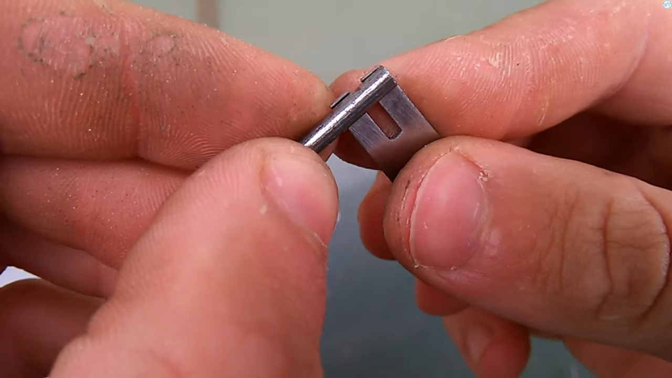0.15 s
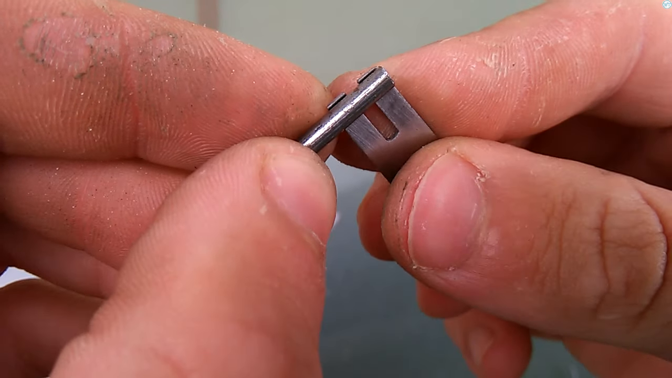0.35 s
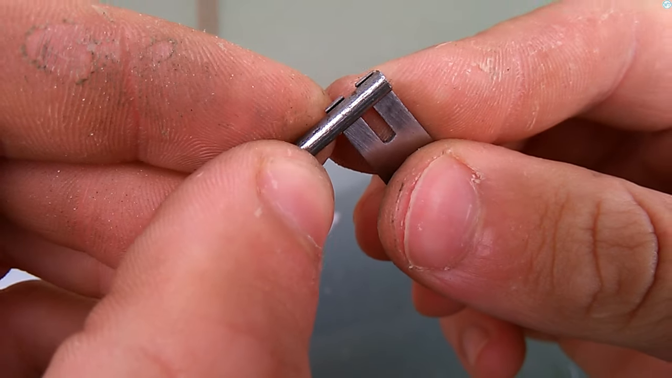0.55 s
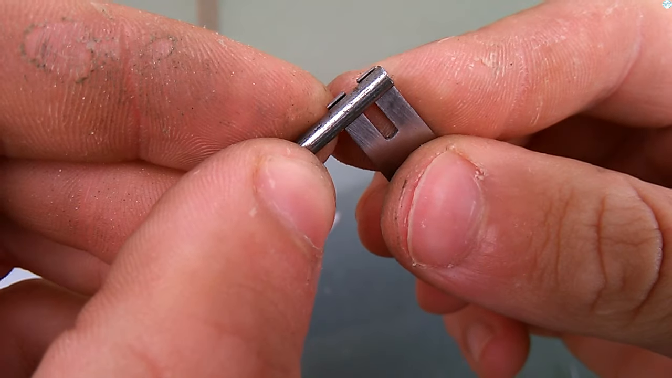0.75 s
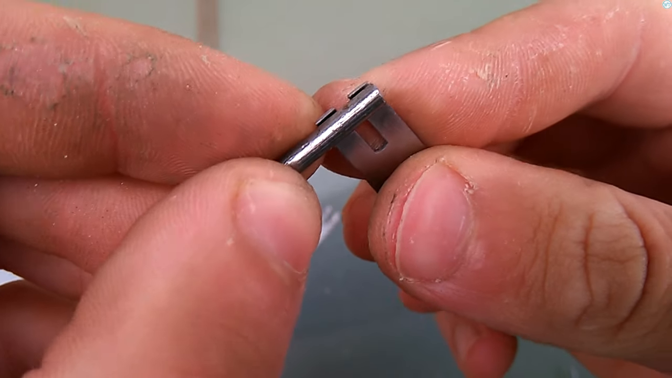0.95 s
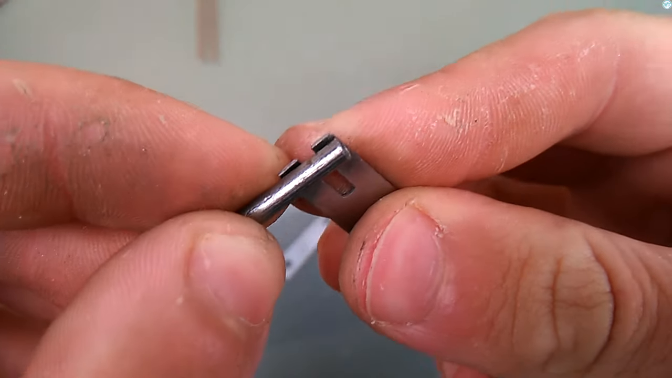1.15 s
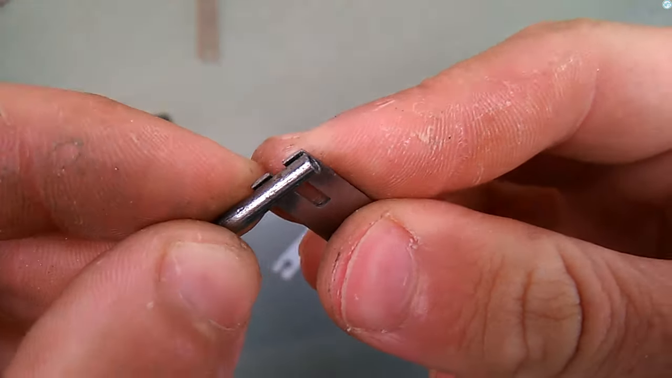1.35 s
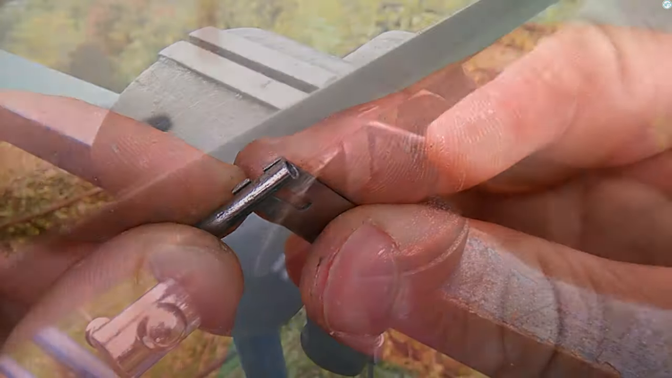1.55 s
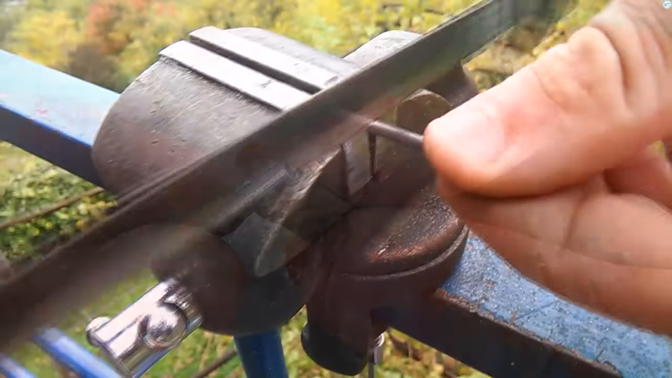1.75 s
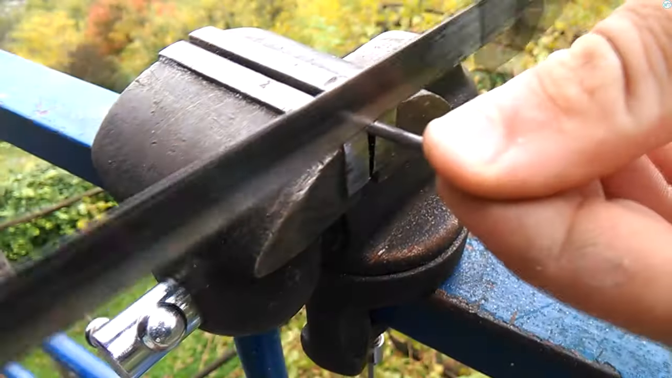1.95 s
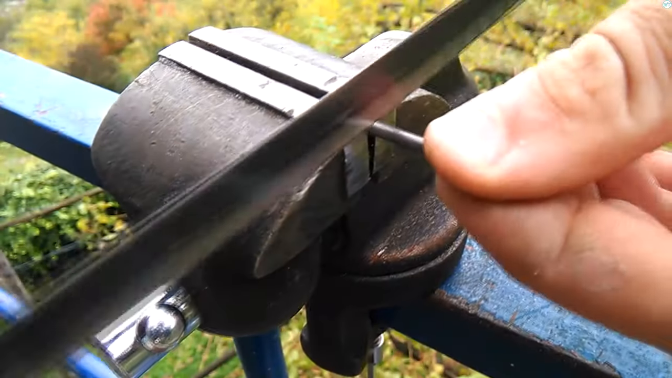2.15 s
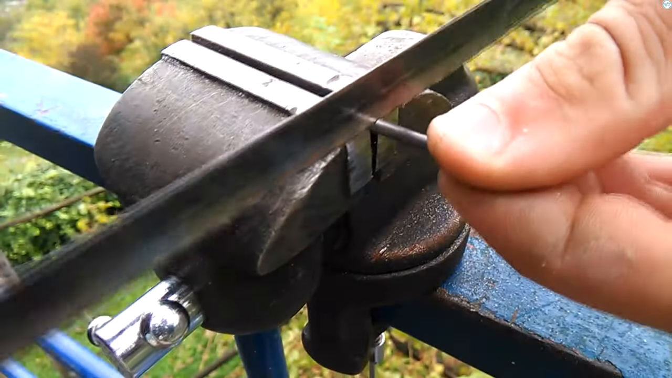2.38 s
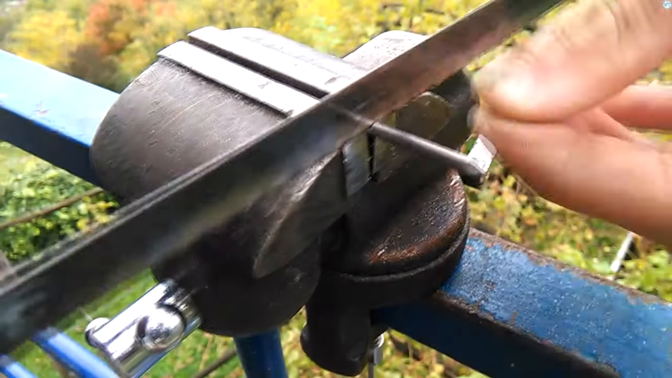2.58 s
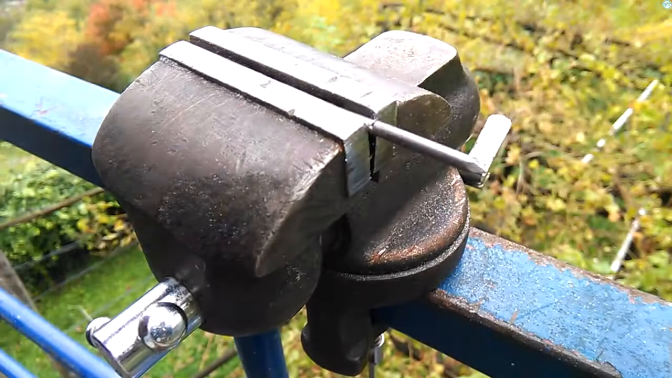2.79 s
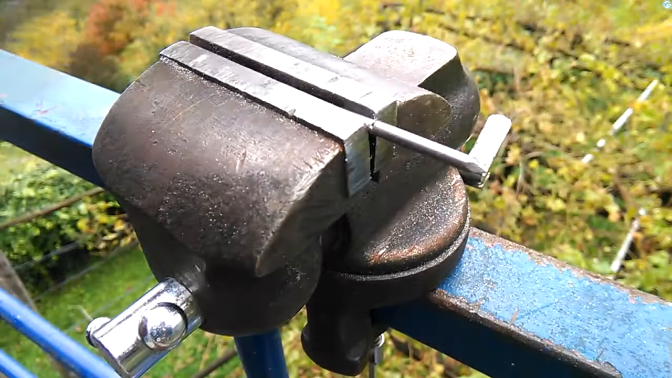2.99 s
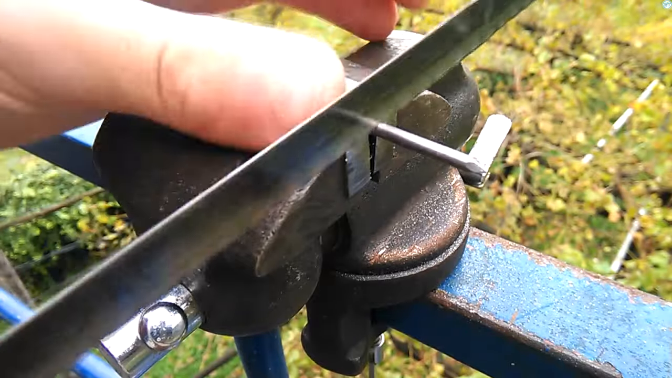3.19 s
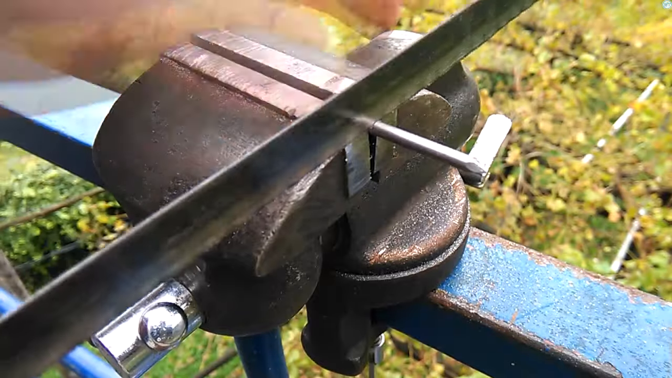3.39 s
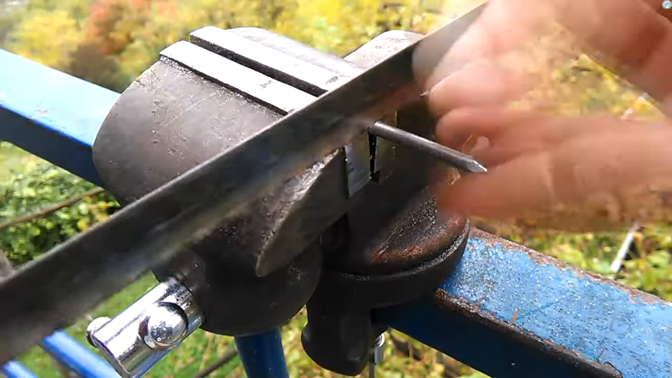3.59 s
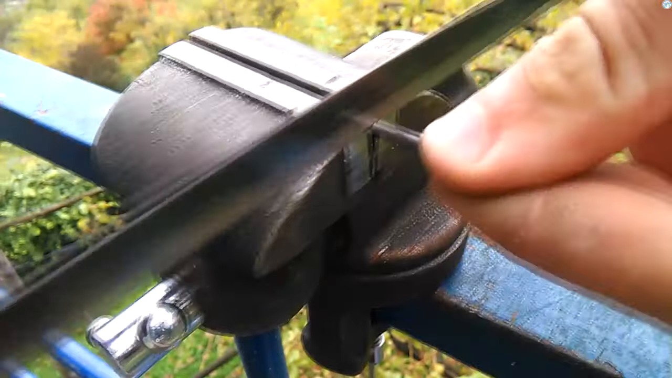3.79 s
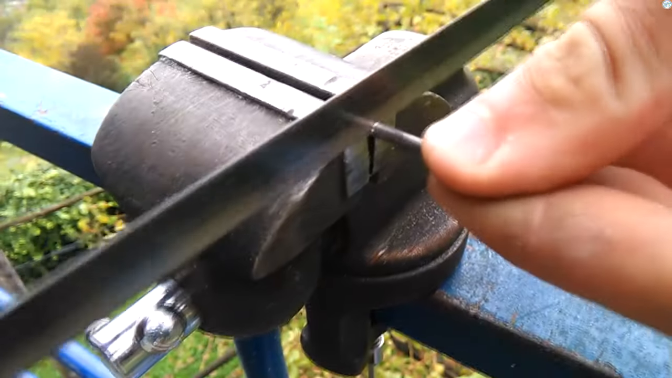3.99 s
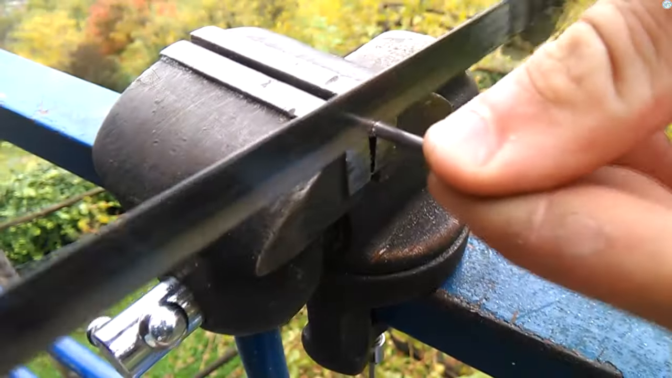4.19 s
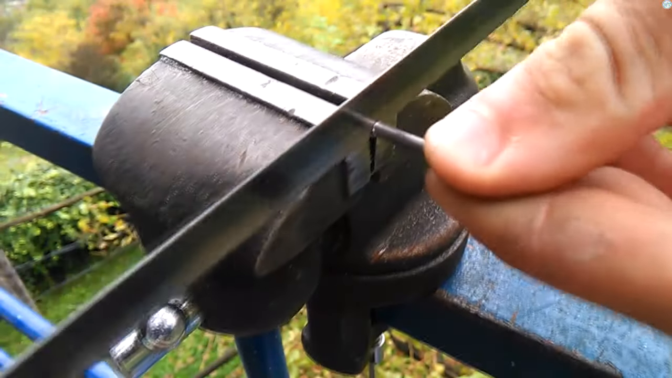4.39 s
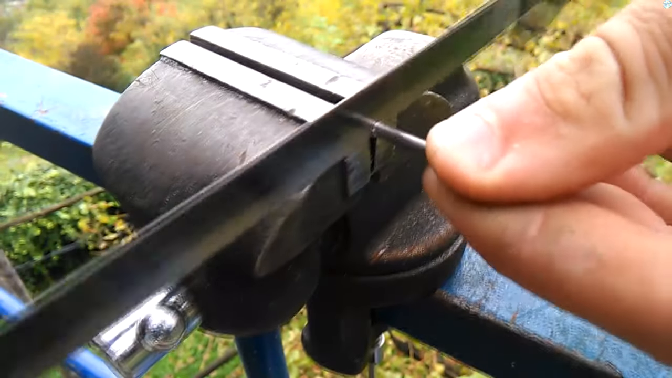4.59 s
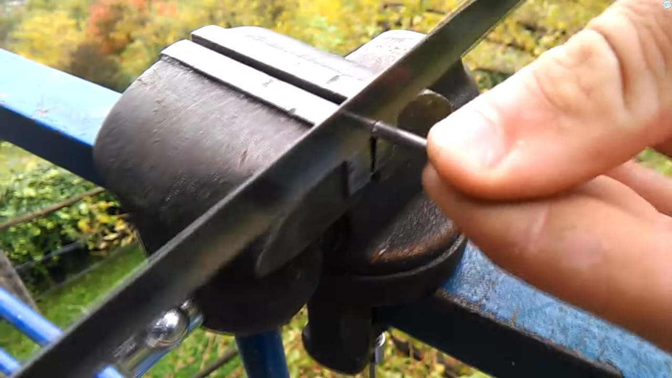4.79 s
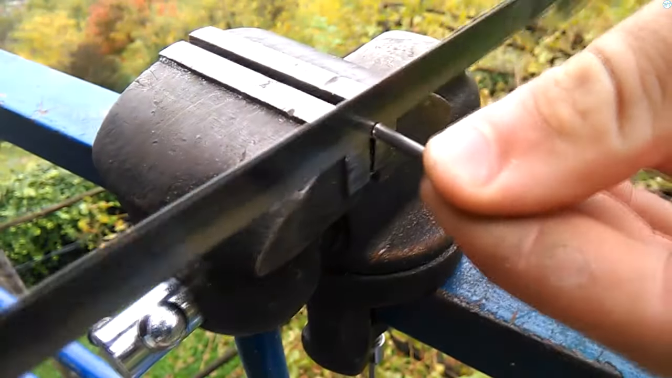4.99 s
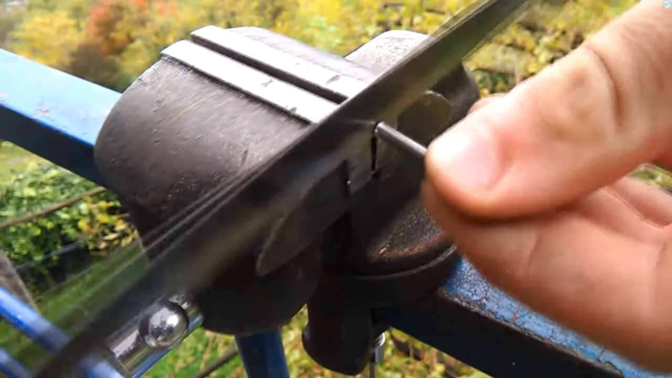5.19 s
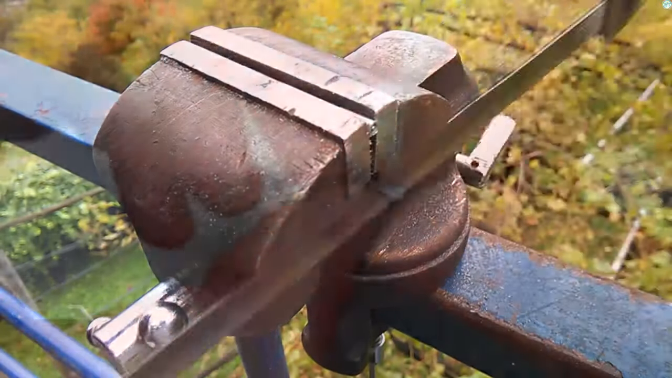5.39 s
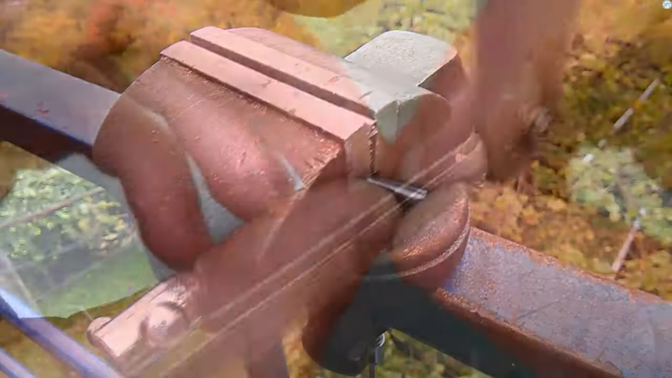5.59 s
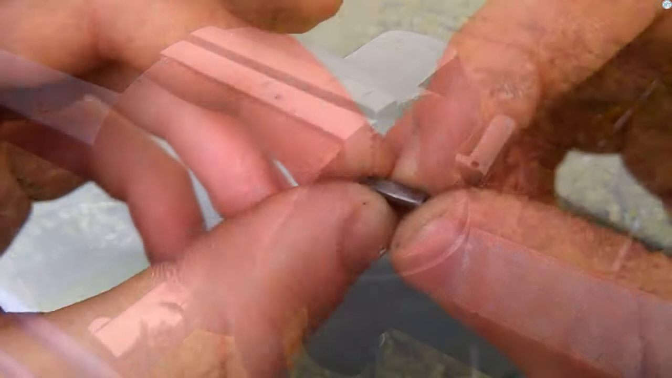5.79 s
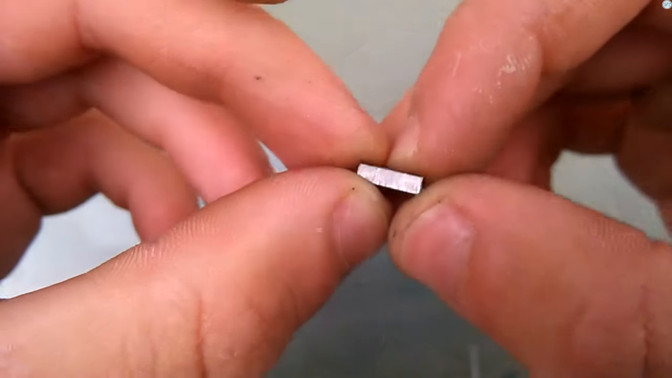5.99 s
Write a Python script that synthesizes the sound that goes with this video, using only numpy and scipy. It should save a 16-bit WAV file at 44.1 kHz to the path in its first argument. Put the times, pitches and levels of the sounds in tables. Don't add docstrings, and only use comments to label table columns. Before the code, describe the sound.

Outdoors, distant traffic drones and low wind rumble, a far engine passing. Then a hacksaw cuts a thin steel rod in a vise, quick short strokes rasping bright and metallic. It stops, one short stroke slips with a knock, and faint blade scrapes follow. A longer, louder burst of sawing ends in small clicks, a vise thud and a tiny squeak. Close microphone, picking up vibration through the railing.

```python
import sys
import numpy as np
from scipy import signal
from scipy.fft import rfft, irfft, next_fast_len
from scipy.io import wavfile
from scipy.ndimage import uniform_filter1d, map_coordinates

SR = 44100
rng = np.random.default_rng(int(sys.argv[2]) if len(sys.argv) > 2 else 0)


def invert_db(x):
    u = np.asarray(x, float) / 20
    return 10 ** u


def dump_mix(stems):
    frames = np.atleast_2d(stems).T
    limited = np.clip(frames, -1, 1)
    pcm = np.round(limited * 32767).astype(np.int16)
    wavfile.write(sys.argv[1], SR, pcm)


N = 266805


def unit(x):
    return x / np.sqrt(np.mean(x ** 2) + 1e-20)


def curves(rows):
    s, *cols = np.transpose(rows)
    return [np.interp(np.arange(N) / SR, s, c) for c in cols]


def wobble(rate):
    coarse = np.arange(0, N + 16, 16)
    knots = rng.standard_normal(int(N * rate / SR) + 4)
    return np.interp(np.arange(N), coarse, map_coordinates(knots, [coarse * rate / SR]))


def coloured(x, spectrum):
    m = next_fast_len(N + 8192)
    f, db = np.transpose(spectrum)
    log_f = np.log(np.fft.rfftfreq(m, 1 / SR) + 1)
    gain = invert_db(np.interp(log_f, np.log(f), db, left=-120))
    return irfft(rfft(x, m) * gain, m)[:N]


def rush(spectrum, patchy_db):
    z = signal.stft(rng.standard_normal(N + 512), nperseg=512)[2]
    field = uniform_filter1d(uniform_filter1d(rng.standard_normal(z.shape), 5, 0), 8, 1)
    patchy = signal.istft(z * invert_db(patchy_db * unit(field)), nperseg=512)[1][:N]
    return unit(coloured(patchy, spectrum))


def resonate(x, hz, width_hz):
    return signal.lfilter(*signal.iirpeak(min(hz, 20000), hz / width_hz, SR), x)


# closest approach t/s, tyre level/dB, engine level/dB, passing time t/s
CARS = [
    (.4, -77, -59.5, .5),
    (3.12, -77.5, -70, .12),
    (5.45, -76.5, -69.5, .15),
    (6.03, -82.5, -63.5, .12),
]


def passing(column):
    t = np.arange(N) / SR
    return sum(invert_db(car[column]) / (1 + ((t - car[0]) / car[3]) ** 2) for car in CARS)


# t/s, level/dB
TRAFFIC = [(0, -68.5), (.85, -70), (1.55, -68.5), (2.42, -72), (2.57, -78), (2.75, -70.5), (3.0, -77),
           (3.76, -77), (5.5, -70.5), (6.05, -70.5)]
# f/Hz, level/dB (per Hz)
DRONE = [(130, -32), (220, -3), (307, -9), (425, -6.5), (575, -12), (930, -15.5), (1180, -23.5),
         (1500, -26), (1820, -59), (3080, -120)]
TYRES = [(590, -30.5), (980, -4), (1200, -11), (2080, -14), (3000, -17), (4000, -33), (5850, -59.5),
         (9900, -120)]
HISS = [(1760, -31), (3000, -7), (3620, -11.5), (4280, 0), (4880, -3.5), (14500, -9), (15800, -11)]


def street():
    drone_db, = curves(TRAFFIC)
    tyre_floor_db = -84
    tyres = invert_db(tyre_floor_db) + passing(column=1)
    hiss_db = -85 + .3 * (drone_db - drone_db.mean())
    drone = invert_db(drone_db + 3.0) * rush(DRONE, patchy_db=2.5)
    swish = tyres * invert_db(1.5) * rush(TYRES, patchy_db=3.0)
    return drone + swish + invert_db(hiss_db + 3.0) * rush(HISS, patchy_db=1.5)


# t/s, level/dB
RUMBLE_LEVEL = [(0, -50.5), (.6, -59.5), (1.03, -53.5), (1.53, -60.5), (2.0, -48), (2.14, -54.5), (2.33, -51.5),
                (2.56, -59.5), (2.65, -47.5), (2.98, -64), (3.6, -62.5), (4.04, -44), (4.26, -46), (4.43, -59),
                (4.92, -45), (5.29, -49.5), (5.7, -57), (6.05, -50.5)]
# f/Hz, level/dB (per Hz)
RUMBLE = [(8.8, -32), (15, 1.5), (33, 2.5), (70, -6.5), (90, -6.5), (120, -34.5), (200, -120)]
HUM = [(47, -36), (80, -10.5), (124, 0.5), (140, 0), (162, -5.5), (226, -9), (260, -10.5), (340, -38),
       (570, -120)]


def railing():
    rumble_db, = curves(RUMBLE_LEVEL)
    _, top_db, _, _, vise_db = strokes()
    traffic_db, = curves(TRAFFIC)
    shake_t60_s, vise_share, shake_db, jolt_db = 0.26, 0.54, -13, -16.5
    fade = np.exp(-np.log(1e6) / (shake_t60_s * SR))
    push = invert_db(2 * (top_db + vise_share * vise_db + shake_db)) * (1 - fade)
    for s, db, *_, passed_db in THUDS:
        push[round(s * SR)] += invert_db(2 * (db + passed_db + jolt_db))
    idle_db = -69 + .6 * (traffic_db - traffic_db.mean())
    idle = invert_db(2 * idle_db) + passing(column=2) ** 2
    hum = np.sqrt(signal.lfilter([1], [1, -fade], push) + idle) * invert_db(1.3 * wobble(5.9))
    hum = hum * invert_db(1.5 * wobble(14)) * rush(HUM, patchy_db=1.0)
    return invert_db(rumble_db + 0.4 + 0.98 * wobble(14)) * rush(RUMBLE, patchy_db=0.5) + hum


# start t/s, end t/s, f/Hz, level/dB
ENGINE = [
    (.2, 0.77, 88.9, -57.5),
    (.22, 1.4, 128, -65),
    (.45, 0.92, 204.6, -66),
    (1.0, 1.58, 206, -68.5),
]


def engine():
    t = np.arange(N) / SR
    out = np.zeros(N)
    for start, end, hz, db in ENGINE:
        swell = np.sin(np.pi * np.clip((t - start) / (end - start), 0, 1)) ** 0.49
        turns = np.cumsum(hz * (1 + 0.0301 * wobble(8))) / SR
        out += invert_db(db + 2.0 + 2.4 * wobble(11.9)) * swell * np.sin(2 * np.pi * turns)
    return out


# turning point t/s, level/dB at full speed, stall level/dB relative to it; the last row ends the burst
FIRST_CUT = [(1.592, -43, -12), (1.643, -36, -20), (1.712, -38.5, -11), (1.765, -33, -14),
             (1.829, -33, -13), (1.886, -31.5, -11.5), (1.941, -30, -14.5), (1.995, -29, -7),
             (2.055, -27, -20.5), (2.116, -28, -8), (2.176, -28.5, -20.5), (2.233, -30, -16),
             (2.296, -26.5, -19), (2.372, -28.5, -42)]
SLIP = [
    (2.597, -26.5, -9.5),
    (2.662, -26, -30.5),
]
SECOND_CUT = [(3.796, -33.5, -16.5), (3.845, -26, -29), (3.917, -27.5, -13.5), (3.995, -25, -17),
              (4.063, -24.5, -12.5), (4.136, -24.5, -18.5), (4.203, -23.5, -16.5), (4.268, -24.5, -19),
              (4.341, -25, -9), (4.413, -25, -20.5), (4.485, -25.5, -12.5), (4.55, -26.5, -21),
              (4.62, -26, -18), (4.692, -25.5, -21.5), (4.76, -26.5, -20), (4.831, -27, -22),
              (4.896, -25.5, -16), (4.968, -26.5, -18), (5.031, -26, -18.5), (5.109, -27.5, -20.5),
              (5.179, -28.5, -18.5), (5.255, -28, -22), (5.341, -29.5, -4.5), (5.368, -38.5, 4.5),
              (5.42, -50, 0.5), (5.465, -49, -30.5)]
# first move (push 0, pull 1), frame gain on the push level/dB, vise gain on the push level/dB
BURSTS = [
    (0, 1.5, 2),
    (0, 0.1, -0.2),
    (1, 2.5, -1.5),
]
BITE_AT = [
    [.5, .4, .5, .4, .5, .4, .5, .4, .5, .4, .5, .4, .5, .4],
    [.3, .4],
    [.52, .55, .58, .45, .5, .5, .44, .5, .44, .55, .38, .45, .4, .5, .44, .5, .44, .5, .44, .5, .44, .5,
     .44, .5, .44, .5],
]
# level/dB, burst by burst
FRAME_SHAKE_DB = [
    [.1, .1, .1, .1, .1, .1, .1, .1, .1, .1, .1, .1, .1, .1],
    [.1, -0.5],
    [1.3, -2, -1, .1, -1, 0.3, -0.2, -0.5, 0.5, 0.3, -0.5, 1.2, -0.5, 1.5, -0.5, 0.7, -1.5, 0.5, 0.7, -1,
     -3, -1, -3, .1, .1, .1],
]
# t/s, frame level/dB, vise level/dB
LOAD = [(1.61, -5.5, -16), (1.7, -14.5, -15), (1.93, -18, -14.5), (2.1, -16, -16.5), (2.33, -9, -16.5),
        (2.62, -9, -20.5), (3.82, -3, -14), (3.95, -6.5, -11.5), (4.1, -6, -13.5), (4.25, -8, -16),
        (4.4, -8.5, -18), (4.6, -7, -19.5), (4.9, -9, -17.5), (5.28, -6.5, -17.5), (5.36, -28, -19)]


def strokes():
    t = np.arange(N) / SR
    landing_s = 0.0066
    arm, top_db, dip_db, gains = np.zeros(N), np.full(N, -200.), np.zeros(N), []
    bursts = zip((FIRST_CUT, SLIP, SECOND_CUT), BITE_AT, FRAME_SHAKE_DB, BURSTS)
    for cut, bite_at, shake_db, (first, *push_db) in bursts:
        turn, fast_db, stall_db = np.transpose(cut)
        first = round(first)
        pushing = (np.arange(len(turn)) + first) % 2 == 0
        fast = turn + np.clip(bite_at, .2, .8) * np.diff(turn, append=turn[-1] + .02)
        knots = np.ravel([turn, fast], "F")[:-1]
        inside = (t > turn[0] - landing_s) & (t < turn[-1])
        phase = np.pi * (first + np.interp(t, knots, np.arange(len(knots))) / 2)
        top = fast_db[np.clip(np.searchsorted(turn, t) - 1, 0, len(turn) - 1)]
        arm += inside * phase
        top_db = np.where(inside, top, top_db)
        stall = fast_db + stall_db
        floor_db = np.interp(t, [turn[0] - landing_s, *turn], [stall[0] - 24, *stall]) - 2.0
        bite = np.minimum(1.09 * np.abs(np.sin(phase)), 1) ** 0.85
        dip_db += inside * (floor_db - top) * (1 - bite)
        for s, push, shake in zip(fast, pushing, shake_db):
            sign = 1 if push else -1
            gains.append((s, sign * push_db[0] + shake, sign * push_db[1]))
    return arm, top_db, dip_db, *np.add(curves(LOAD), curves(gains))


def teeth(speed, top_hz, scatter, size_db):
    rate = top_hz * (.25 + .75 * speed) * invert_db(1.5 * wobble(9))
    passed = np.cumsum(rate / SR)
    luck = rng.standard_normal((int(passed[-1]), 2))
    at = np.interp(np.arange(len(luck)) + scatter * luck[:, 0], passed, np.arange(N)).astype(int)
    return unit(np.bincount(at, invert_db(size_db * luck[:, 1]), N) / np.sqrt(rate))


def body(force, modes, arm, shift_db, rate, loose, loose_db, tilt=0):
    power = sum(invert_db(2 * db) * width * np.pi / SR for _, width, db, *_ in modes)
    first_cut = np.arange(N) < SR * SLIP[0][0]
    stance = 1.47 * np.array([-np.cos(arm), np.sin(arm), first_cut])
    middle_hz = modes[len(modes) // 2][0]
    out = np.zeros(N)
    for k, (hz, width, db, *lean) in enumerate(modes):
        drive_db = lean @ stance + tilt * np.log2(hz / middle_hz) + shift_db * wobble(rate)
        if k == loose:
            drive_db = drive_db + loose_db
        out += (-1) ** k * invert_db(db) * resonate(force * invert_db(drive_db), hz, width)
    return out / np.sqrt(power)


BLADE = [(2480.0, 27, -14, -0.1, -1, -3), (2631, 60, 0.5, -3.5, -1, 1), (2799, 64, -5.5, -4.5, -0.5, 2.5),
         (3565, 73, -1, -0.5, 1, -0.1), (4220.0, 95, -6.5, 2.5, -2.5, -3.5),
         (4720, 32, -3, -0.2, -2.7, 0.5), (4833, 71, -6, 1, 0.5, -0.5), (5213, 45, -0.6, 0.5, 3.5, 0.9),
         (5674, 60, -3, -3.5, 0, -1), (5757, 55, 3.5, -4.5, 2, 1.5), (5900, 110, -6.5, 0, -1.5, -1.5),
         (6440, 67, -5, -1.5, 6, -0.5), (6740, 50, -7.5, 2.5, -1.5, 0), (7315, 60, -6, 1, 4, 1.5),
         (7565, 28, 5, 2.5, 2.5, -0.5), (7740.0, 32, -5.5, 1, 0.1, -3), (8070, 100, 0.5, -0.5, -0.5, 1.5),
         (8246, 100, -6, -1, -2, 2.5), (8450, 60, -6.5, -1.5, 3.5, -1.7), (9015, 28, -2.5, -1.6, 3.5, 2)]
FRAME = [(1134, 39, -6.5, 4.1, 3.5, -1.6), (1320, 70, -1.5, 3.6, -2.5, 3),
         (1510, 130, -11.5, 0.94, 2.5, 0.5), (1620, 70, -3, 3, 0.8, -1), (1707, 45, 0.6, 4.5, 0.4, 1.5),
         (1870, 30, -6.5, 4.5, 0.5, -2), (2062, 60, -6, 2, -0.3, 1.5), (2186, 42, .6, 2.6, -1, 1)]
VISE = [(294, 54, -3, 2.5, 2, -2.5), (397.3, 48, -2.5, -2, 0.74, -2.5), (578.5, 53, 0.7, 0, -0.66, -1.6),
        (694, 42, 2.5, -4, -1.3, 2), (808, 54, -11, -8, -2.2, 1.5)]
# f/Hz, level/dB (per Hz)
RASP = [(530, -40), (900, -4.5), (1050, -10), (1700, -5.5), (2380, -5), (2710, -7), (3090, -7),
        (5770, -1.5), (7160, -6.5), (7790, -5), (15800, -24)]
# t/s, vise level/dB per octave, frame level/dB per octave
GRIP = [(1.65, -6, 0.5), (1.95, 4, .1), (2.2, 2.5, 0.3), (2.33, -1, 2.5), (2.62, -3, -3.5), (3.85, -1, 0.2),
        (4.0, -4, -0.5), (4.13, -3.5, .1), (4.24, 6, 2.5), (4.6, 0, 1.7), (5.0, -0.5, 0.5),
        (5.3, -0.2, -6.5)]
# t/s, jaw level/dB, frame bow level/dB, blade back level/dB, brightness level/dB
SEATING = [(1.62, -3, -0.5, -1.5, -1), (1.8, -5.5, 1, 0, -0.5), (1.95, 2.5, 1, 1, 1),
           (2.15, 0.5, -0.5, -1, 1), (2.28, -4.5, -0.5, 3, .3), (2.34, -2, 0.6, 0.8, -1),
           (2.62, -3, -2.5, -0.1, -1.5), (3.82, -2.5, 0.5, 5.5, -0.5), (3.97, -3.5, -0.5, 2.5, 1.5),
           (4.12, -4, 0.8, .3, -0.5), (4.24, 2, 0, 0, -0.4), (4.45, -0.3, 0, -1, 0),
           (4.65, -1, -3, -1, -0.5), (4.85, 2, -4, -1, 0), (5.05, -1, -3, -1.5, 0.5),
           (5.2, -2.5, -3, -1, -1), (5.32, 1.5, 0, 0.5, 1), (5.42, 2, -3.5, 0, 3.5)]


def saw():
    arm, top_db, dip_db, frame_db, vise_db = strokes()
    vise_tilt, frame_tilt = curves(GRIP)
    jaw_db, bow_db, back_db, bright_db = curves(SEATING)
    blows = teeth(np.abs(np.sin(arm)), top_hz=1653, scatter=.3, size_db=3.5)
    blows = np.diff(blows, prepend=0)
    force = 0.52 * blows + 0.78 * rng.standard_normal(N)
    force = force * invert_db(top_db + 1.05 * wobble(160) + 0.55 * wobble(60))
    blade = body(force * invert_db(dip_db), BLADE, arm, shift_db=1.5, rate=30,
                 loose=1, loose_db=back_db, tilt=bright_db)
    frame = body(force * invert_db(0.8 * dip_db + frame_db), FRAME, arm, shift_db=1.66, rate=25,
                 loose=4, loose_db=bow_db, tilt=frame_tilt)
    vise = body(force * invert_db(0.42 * dip_db + vise_db), VISE, arm, shift_db=2.2, rate=22,
                loose=3, loose_db=jaw_db, tilt=vise_tilt)
    chips = coloured(force * invert_db(dip_db), RASP)
    treble = signal.lfilter(*signal.butter(2, 6800, "highpass", fs=SR), chips)
    chips = chips + (invert_db(bright_db) - 1) * treble
    damp_db_per_s, damp_after_s = 1100, -.014
    since = np.arange(N) / SR - damp_after_s - np.array([[FIRST_CUT[-1][0]], [SLIP[-1][0]]])
    resting = invert_db(-damp_db_per_s * np.where((since > 0) & (since < .2), since, 0).sum(axis=0))
    return resting * (invert_db(-4.5) * blade + invert_db(-3.0) * frame) + invert_db(-1.5) * vise + invert_db(5.5) * chips


# t/s, level/dB, f/Hz, decay time t60/s, passed to the railing level/dB
THUDS = [
    (5.611, -29.5, 600, 0.11, -11),
    (5.613, -32.5, 293, 0.19, -1),
    (2.606, -30.5, 1130, 0.12, -13),
    (2.628, -28.5, 396, 0.17, -5),
    (2.612, -29, 2050, .16, -20),
    (2.8, -46.5, 187, 0.16, .1),
    (3.8, -33, 271, 0.61, 3),
    (1.6, -42.5, 272, 0.56, 2),
    (2.495, -59.5, 900, .15, -13),
    (2, -62, 950, .15, -13),
]


def thuds():
    out, t = np.zeros(N + SR), np.arange(SR // 4) / SR
    for s, db, hz, t60, _ in THUDS:
        thud = resonate(resonate(rng.standard_normal(len(t)), hz, .4 * hz), hz, .4 * hz)
        out[round(s * SR):][:len(t)] += invert_db(db - 11.5 - 60 * t / t60) * unit(thud) * (1 - np.exp(-t / 0.0017))
    return out[:N]


# t/s, peak level/dB, scrape length t/s, ringing f/Hz
GRAZES = [
    (2.547, -51, 0.0075, 7460),
    (2.701, -61, 0.011, 5740),
    (2.821, -46, 0.027, 5500),
    (2.858, -69, 0.15, 8400),
    (3.386, -55.5, .01, 4900),
    (3.599, -54, 0.011, 9100),
    (3.606, -51.5, 0.031, 9080),
    (5.445, -58, .015, 6906),
    (5.604, -60, 0.0087, 6540),
]
KNOCKS = [(4.2, -39, .0027, 6300), (5.349, -24, 0.008, 7560), (5.32, -23, 0.0087, 6500),
          (5.378, -25, 0.0066, 8700), (5.39, -45, 0.043, 7600), (5.498, -44.5, 0.015, 6500),
          (5.488, -60, .01, 8000), (3.395, -49.5, 0.013, 6800), (3.817, -23, .008, 2650),
          (3.9, -33, .008, 5760), (4.2, -34, .008, 5760), (4.1, -28, 0.0088, 8080),
          (4.281, -25.5, .008, 5760), (4.424, -31, .008, 5760), (2.612, -20, .022, 5760),
          (4.004, -30, .008, 8080), (2.074, -29, .007, 8080), (5.428, -47, .008, 8200),
          (5.29, -27, 0.011, 11000) ]
CLUNKS = [
    (5.611, -32.5, 0.0056, 2230),
    (5.613, -45, 0.018, 9015),
    (5.616, -50, 0.025, 2220),
]
PINGS = [(2.822, -56, 0.018, 1700), (2.83, -63, 0.011, 4220), (2.832, -65, 0.0089, 3670),
         (2.828, -69, .012, 2490), (2.86, -74, .02, 2490), (2.826, -60, .008, 5400),
         (3.222, -69, 0.025, 4220), (3.292, -65, 0.012, 2480), (3.36, -75, .02, 7540),
         (3.39, -71, 0.016, 3100), (3.41, -69, .03, 7560), (3.495, -72, .008, 7590),
         (3.648, -70, .014, 7740), (3.648, -78, .007, 6550), (3.648, -74, .01, 9000),
         (2.548, -80, .006, 4220), (3.285, -71, .014, 4200), (3.318, -72, .01, 4220),
         (3.345, -76, .012, 4220), (5.428, -47, 0.013, 4220), (5.435, -54, 0.011, 8300),
         (5.415, -56, .012, 1780), (5.428, -58, .01, 2020), (5.438, -55, 0.012, 2200),
         (5.445, -63, .008, 2821), (5.503, -61, .008, 2500), (5.5, -60, 0.0054, 2821),
         (5.503, -60, 0.01, 1600), (5.498, -61, .006, 2130), (5.5, -61, .006, 3800), (5.5, -54, .008, 4215),
         (5.636, -61, 0.012, 2490), (3.398, -65, 0.012, 7570)]
TICKS = [
    (2.45, -64, 0.016, 7500),
    (2.466, -59, 0.03, 4890),
    (3.224, -58, .014, 8100),
    (3.283, -65, .014, 6000),
    (3.294, -54.5, .01, 6000),
    (3.316, -62, .016, 4220),
    (3.351, -65, .008, 6750),
    (3.352, -67, .006, 8100),
    (5.508, -53, 0.022, 6480),
]
# ringing level/dB, lowest f/Hz of the grit, highest f/Hz of the grit
CONTACT = [
    (-11, 4100, 10700),
    (-12.5, 2200, 11400),
    (-4.5, 570, 8400),
    (7, 4360, 9000),
    (-14, 4300, 8800),
]
# f/Hz, level/dB, decay time t60/s
STEEL = [(1730, 0.5, 0.06), (2500, -12, 0.13), (2640, -13, 0.07), (2821, -8, 0.1), (4215, -10.5, 0.071),
         (6690, -6, 0.05), (7500, -7.5, 0.11), (8100, -1.5, 0.065), (9022, -23.5, 0.1), (11260, -25, 0.1)]
# f/Hz, width f/Hz
RING_WIDTH = [(1810, 50), (2250, 63), (2490, 15), (2820, 22), (3100, 30), (4220, 38), (5400, 70),
              (7550, 20), (9000, 32)]


def touches():
    out, t = np.zeros(N + SR), np.arange(SR // 4) / SR
    tables = GRAZES, KNOCKS, CLUNKS, PINGS, TICKS
    rows = [(*row, *kind) for table, kind in zip(tables, CONTACT) for row in table]
    for s, db, length, ring_hz, ring_db, low_hz, high_hz in rows:
        rough_db = 4.2 * rng.standard_normal(len(t) // 60 + 1).repeat(60)[:len(t)]
        grit = rng.standard_normal(len(t)) * invert_db(rough_db)
        press = np.sin(np.pi * np.clip(t / length, 0, 1) ** .7) + 0.14 * invert_db(-60 * t / (length + .04))
        tap = grit * press
        band = signal.butter(3, [low_hz, high_hz], "bandpass", fs=SR, output="sos")
        scrape = signal.sosfilt(band, tap)
        ring = np.zeros(len(t))
        for hz, level, t60 in STEEL:
            ring += invert_db(level + rng.normal(0, 4.5)) * resonate(scrape, hz, 1.7 / t60) / np.sqrt(2.2 / t60)
        drive = .5 * tap + .3 * press * np.sin(2 * np.pi * ring_hz * t)
        own = resonate(drive, ring_hz, np.interp(ring_hz, *np.transpose(RING_WIDTH)))
        own = invert_db(ring_db - 0.5) * own / np.abs(own).max()
        out[round(s * SR):][:len(t)] += invert_db(db - 8.5) * (scrape + 13 * ring + own)
    return out[:N]


# t/s, f/Hz, level/dB
SQUEAK = [
    (5.75, 1753, -88.5),
    (5.76, 1945, -66.5),
    (5.778, 2280, -69.5),
    (5.795, 3300, -74),
    (5.808, 3900, -94.5),
]


def fingertip():
    hz, db = curves(SQUEAK)
    angle = 2 * np.pi * np.cumsum(hz * (1 + 0.09 * wobble(1100))) / SR
    tone = np.sin(angle) + 0.77 * np.sin(2 * angle) + .2 * np.sin(3 * angle)
    return invert_db(db + 3.9 * wobble(400)) * tone * (db > -89)


def wall(x):
    t = np.arange(SR // 6) / SR
    dull = signal.lfilter([1], [1, -.6], rng.standard_normal(len(t)))
    tail = dull * invert_db(-60 * t / 0.094) * (t > .004)
    return signal.fftconvolve(x, tail / np.linalg.norm(tail))[:N]


def scene():
    around = street() + railing() + engine()
    steel = saw() + thuds() + touches() + fingertip()
    return (steel + invert_db(-16.5) * wall(steel) + around)[None]


def band_limit(x):
    return signal.sosfilt(signal.butter(12, 16300, fs=SR, output="sos"), x)


def record(dry):
    held = dry / (1 + np.abs(dry / 0.185) ** 4) ** (1 / 4)
    top_hz, edge_hz = 15830, 160
    below_top = np.clip((top_hz - np.fft.rfftfreq(N, 1 / SR)) / edge_hz, 0, 1)
    kept = irfft(rfft(held) * np.sin(np.pi / 2 * below_top), N)
    return band_limit(kept)


dry = scene()
out = record(dry)
dump_mix(out)
```